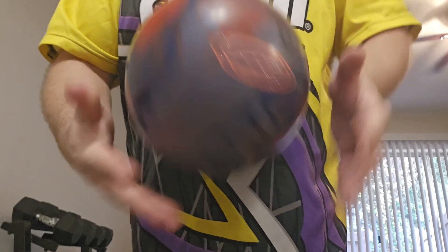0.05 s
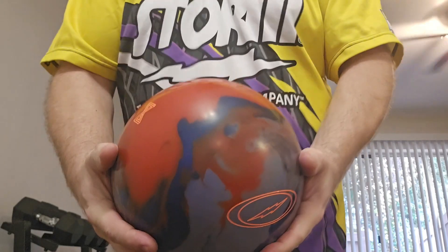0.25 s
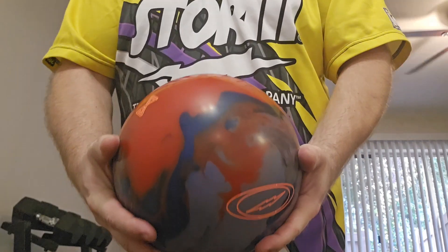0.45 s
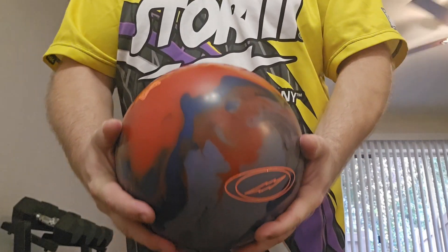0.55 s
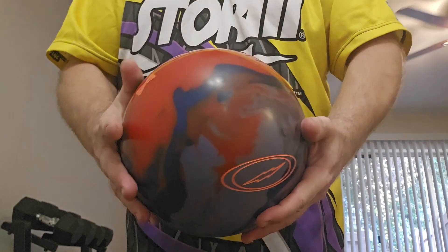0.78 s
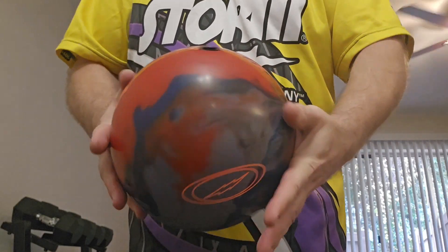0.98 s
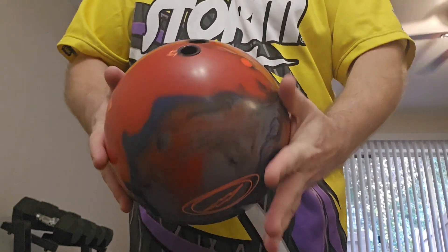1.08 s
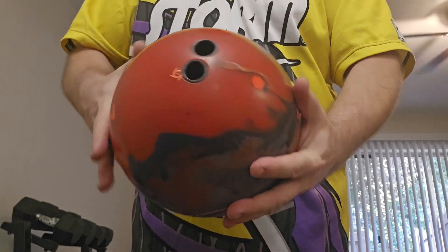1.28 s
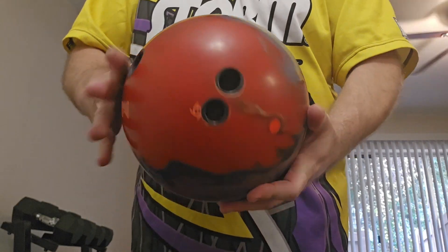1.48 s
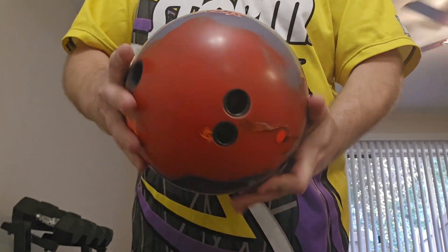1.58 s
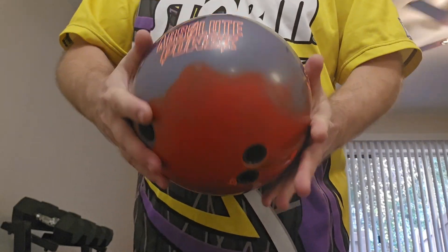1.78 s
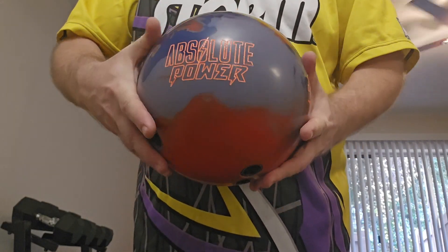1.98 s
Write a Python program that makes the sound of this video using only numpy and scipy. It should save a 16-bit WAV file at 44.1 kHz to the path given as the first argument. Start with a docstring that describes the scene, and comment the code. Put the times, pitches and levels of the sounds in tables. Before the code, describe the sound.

A bowling ball smacks into bare hands, then skin faintly slides and squeaks on it.

```python
"""A bowling ball drops into two bare hands, close up: one palm, then the other and the fingers smack on it.
Each patch of skin cracks and squeezes out a puff of air; the palms thud and the shell rings faintly.
The hands then turn the polished ball: skin slides in grainy swells, fingers pat, and twice the skin
sticks and slips into a squeak. A small room answers, over a low mains hum."""
import sys
import numpy as np
from scipy import signal
from scipy.fft import rfft, irfft, next_fast_len
from scipy.io import wavfile
from scipy.ndimage import map_coordinates

SR = 44100
rng = np.random.default_rng(int(sys.argv[2]) if len(sys.argv) > 2 else 0)


def materialize(psi):
    """Save the field psi as 16-bit PCM at rate SR to the path in sys.argv[1].

    A 1-D psi becomes a single channel; in a 2-D psi each row is a channel.
    """
    bounded = np.clip(np.atleast_2d(psi).T, -1, 1)
    quanta = np.round(bounded * 32767).astype(np.int16)
    wavfile.write(sys.argv[1], SR, quanta)


N = 90404

# tone colour of skin striking the ball: freq_hz, level_db
SKIN_COLOUR = [(100, 7.5), (300, -6), (500, 0.5), (720, -8), (1250, -2), (1700, -9), (2150, -2.5),
               (3000, -9), (4600, -4), (6800, -2.5), (9000, -2), (11700, -4.5), (13000, 0), (15500, -1.5)]
# stereo image of close-up noise: freq_hz, left_right_likeness
CLOSE_LIKENESS = [(200, 0.99), (1000, 0.83), (2200, 0.38), (5000, 0.17), (9000, 0.11), (13000, 0.3)]


def amp(db):
    """Decibels to gain."""
    return 10 ** (np.asarray(db) / 20)


def unit(x):
    """Scale to rms 1."""
    return x / np.sqrt(np.mean(x ** 2) + 1e-20)


def clock():
    """The time of each sample in seconds."""
    return np.arange(N) / SR


def along(points, hz):
    """Read a curve of (freq_hz, value) points on a log frequency axis."""
    freqs, values = np.transpose(points)
    return np.interp(np.log(hz + 1), np.log(freqs + 1), values)


def wobble(rate):
    """A smooth random curve, rate knots a second."""
    return map_coordinates(rng.standard_normal(N // 2), [clock() * rate], mode="wrap")


def filtered(x, response):
    """Filter x by a gain given as a function of Hz."""
    size = next_fast_len(N + SR // 4)
    return irfft(rfft(x, size) * response(np.fft.rfftfreq(size, 1 / SR)), size)[..., :N]


def noise(colour_db, likeness):
    """Stereo noise of rms 1 with a colour (function of Hz) and a left-right likeness curve."""
    def response(hz):
        width = np.arccos(np.clip(along(likeness, hz), -1, 1)) / 2
        return amp(colour_db(hz)) * [np.cos(width), np.sin(width)]
    mid, side = filtered(rng.standard_normal((2, N)), response)
    return unit(np.array([mid + side, mid - side]))


def close_noise(colour, tilt=0):
    """Close-up noise, brightened above 500 Hz by tilt dB per octave."""
    return noise(lambda hz: along(colour, hz) + tilt * np.log2(np.maximum(hz, 500)), CLOSE_LIKENESS)


def pan(db):
    """Channel gains that put the left db above the right."""
    return amp([[db / 2], [-db / 2]])


def burst(start, rise, t60):
    """A straight attack, then an exponential decay."""
    age = clock() - start
    return np.clip(age / rise, 0, 1) * amp(-60 * np.maximum(age - rise, 0) / t60)


def ring(start, modes, rise_s=0.00089):
    """Damped modes set off by a blow."""
    age = np.maximum(clock() - start, 0)
    return sum(burst(start, rise_s, t60) * amp(db) * np.sin(2 * np.pi * hz * age) for hz, db, t60 in modes)


def whistle(peak_s, hz, db, half_length_s, jitter, rate):
    """A short swell of an unsteady tone."""
    pitch = hz * (1 + jitter * wobble(rate))
    tone = np.sin(2 * np.pi * np.cumsum(pitch) / SR)
    return amp(db) * np.exp(-((clock() - peak_s) / half_length_s) ** 2) * unit(tone)


def room_tone(level_db=-62.5):
    """A bed of low rumble and faint hiss, wide in the treble."""
    colour = [(18, -49), (30, -1.5), (133, -3.5), (152, -11.5), (182, -15.5), (359, -16.5), (673, -22.5),
              (767, -25), (945, -25.5), (1680, -31.5), (2180, -31), (2910, -35.5), (4660, -34.5),
              (10200, -44.5), (15500, -40)]  # the still room: freq_hz, level_db
    likeness = [(60, 0.83), (250, 0.79), (600, 0.86), (1500, 0.033), (10000, 0.058)]  # its stereo image: freq_hz, left_right_likeness
    return amp(level_db) * noise(lambda hz: along(colour, hz), likeness)


def mains_hum(pitch_hz=120.3, waver_db=1.5):
    """A low mains hum, each harmonic wavering on its own."""
    harmonics = [-59.5, -76, -83.5, -85.5]  # from the fundamental up: level_db
    phase = 2 * np.pi * pitch_hz * clock() + 0.1 * wobble(6.9)
    return sum(amp(db + waver_db * wobble(4.3)) * np.sqrt(2) * np.sin(k * phase)
               for k, db in enumerate(harmonics, 1))


def room_reverb(x, tail_db=-15, early_db=-10, early_t60_s=0.2, predelay_s=0.005):
    """Quick reflections from body and walls and a tail shortest in the treble, coloured by the room."""
    decay = [(150, 0.6), (350, 1.0), (700, 0.5), (1400, 0.7), (4000, 0.74), (9000, 0.55), (15000, 0.36)]  # length of the tail: freq_hz, t60_s
    colour = [(80, -7), (180, 7), (360, 6), (550, 4), (1200, 3), (2500, 4), (5000, 0), (8500, -4.5),
              (10200, -4), (15000, -1.5)]  # EQ on the whole reverb: freq_hz, gain_db
    hz, t, spectra = signal.stft(rng.standard_normal((2, SR)), SR, nperseg=256)
    fade = amp(-60 * t / along(decay, hz)[:, None])
    tail = signal.istft(spectra * fade, SR, nperseg=256)[1][:, :SR]
    early = rng.standard_normal((2, SR)) * amp(-60 * clock()[:SR] / early_t60_s)
    impulse = amp(tail_db) * tail / np.linalg.norm(tail[0])
    impulse += amp(early_db) * early / np.linalg.norm(early[0])
    impulse = np.pad(impulse, ((0, 0), (int(predelay_s * SR), 0)))
    wet = signal.fftconvolve(x, impulse, axes=1)[:, :N]
    return filtered(wet, lambda f: amp(along(colour, f)))


def skin_slides(graze_s=0.205, graze_db=-54.5, graze_rise_s=0.0024, grain_db=2.0, grain_rate=600):
    """Skin slides over the polished shell: a fine sizzle, one graze and short swells, all grainy."""
    turning = [(0.66, -99), (0.72, -71), (0.93, -79), (1.08, -72), (1.17, -68.5), (1.25, -72), (1.45, -73),
               (1.54, -84), (1.8, -78), (2.04, -80)]  # the sizzle as the ball is turned: time_s, level_db
    sizzle_colour = [(1000, -18), (4000, -9.5), (7500, -9), (10300, -17.5), (12000, -5), (13500, -6),
                     (15000, -1)]  # freq_hz, level_db
    strokes = [(0.015, -60.5, 0.01, 0.032, 1.5), (0.042, -61, 0.008, 0.012, 0.5),
               (0.694, -65.5, 0.018, 0.05, 0), (0.726, -57.5, 0.018, 0.028, -0.5),
               (0.813, -54.5, 0.01, 0.016, 7), (0.89, -68.5, 0.03, 0.022, -2),
               (0.991, -60.5, 0.016, 0.027, -1), (1.125, -63, 0.027, 0.043, 4),
               (1.31, -68.5, 0.025, 0.035, -1), (1.427, -70.5, 0.029, 0.06, 0),
               (1.579, -74.5, 0.016, 0.02, -2), (1.63, -62.5, 0.016, 0.0174, 2),
               (1.76, -77, 0.088, 0.14, -0.5), (1.892, -61, 0.016, 0.036, 0),
               (1.96, -71, 0.045, 0.0794, -5.5)]  # single slides: peak_s, level_db, rise_s, release_s, tilt_db_per_octave
    stroke_colour = [(300, -19.5), (1200, -16.5), (2200, -9.5), (4500, -2), (7500, -3), (10300, -10),
                     (12000, -0.5), (15500, -8.5)]  # freq_hz, level_db
    t = clock()
    friction = amp(np.interp(t, *np.transpose(turning), left=-120)) * close_noise(sizzle_colour)
    # the falling ball grazes the fingers just before it lands
    graze = np.exp(-np.abs((t - graze_s) / graze_rise_s))
    friction += amp(graze_db) * graze * close_noise(SKIN_COLOUR)
    for peak, db, rise, release, tilt in strokes:
        swell = np.exp(-np.where(t < peak, ((peak - t) / rise) ** 2, (t - peak) / release))
        friction += amp(db) * swell * close_noise(stroke_colour, tilt)
    return friction * unit(amp(grain_db * wobble(grain_rate)))


def singing_slides():
    """Some slides sing faintly, just short of a squeak."""
    tones = [(0.034, 3245, -66.5, 0.013), (0.721, 3160, -71.5, 0.024), (0.99, 4500, -69.5, 0.011),
             (1.053, 4400, -73, 0.0086), (1.909, 5330, -69.5, 0.023), (1.957, 4410, -74, 0.04)]  # peak_s, pitch_hz, level_db, half_length_s
    return sum(whistle(*tone, jitter=0.065, rate=1100) for tone in tones)


def finger_pats(rise_s=0.00056):
    """Fingers land softly as the grip changes, each a tick of noise and a hollow knock."""
    pats = [(0.0346, -51.5, 0.01, -4, -1), (0.7735, -65, 0.015, 0.5, 3), (0.8065, -46.5, 0.035, 2, -2.5),
            (1.888, -59, 0.03, -2, 0.5), (1.947, -61, 0.034, -3.5, -3.5)]  # start_s, level_db, t60_s, knock_db, tilt_db_per_octave
    tick_colour = [(100, -2), (250, -19.5), (600, 6.5), (1150, -11), (2000, -7.5), (2800, -4.5),
                   (5000, -1.5), (10000, -7), (15000, -11.5)]  # freq_hz, level_db
    knock_modes = [(112, -1.5, 0.04), (470, -0.5, 0.025), (770, -4, 0.021), (1620, -5.5, 0.025),
                   (1994, -7.5, 0.036), (2330, -4, 0.019)]  # pitch_hz, level_db, t60_s
    out = np.zeros((2, N))
    for start, db, t60, knock_db, tilt in pats:
        tick = burst(start, rise_s, t60) * close_noise(tick_colour, tilt)
        out += amp(db) * (tick + amp(knock_db) * ring(start, knock_modes))
    return out


def stick_slip(glide, partials, jitter, flutter_db, pan_db, lag_ms):
    """Skin sticks and slips at an unsteady rate; the right channel hears it lag_ms later."""
    times, hz, db = np.transpose(glide)
    t = clock()
    pitch = np.interp(t, times, hz) * (1 + jitter * wobble(900))
    lag_s = np.array([[0], [lag_ms / 1000]])
    phase = 2 * np.pi * (np.cumsum(pitch) / SR - pitch * lag_s)
    level = amp(np.interp(t, times, db, left=-140, right=-140) + flutter_db * wobble(400))
    tone = sum(amp(partial_db) * np.sin(ratio * phase) for ratio, partial_db in partials)
    return pan(pan_db) * level * unit(tone)


def skin_squeaks():
    """Skin catches twice on the polish: a thin falling chirp, then a lower, richer squeak."""
    chirp_glide = [(0.7245, 9410, -75), (0.7266, 8900, -29.5), (0.7279, 8440, -73), (0.7290, 8150, -35),
                   (0.7325, 7960, -62), (0.737, 7880, -56)]  # played 1% flat: time_s, pitch_hz, level_db
    squeak_glide = [(1.115, 2900, -76), (1.120, 2814, -48.5), (1.131, 2920, -46), (1.140, 2963, -48),
                    (1.150, 2860, -56.5), (1.168, 2870, -74)]  # time_s, pitch_hz, level_db
    harmonics = [-5, -2, -4.5, -4.5, -4]  # of the squeak, from the fundamental up: level_db
    undertone = (1 / 3, -21.5)  # every third slip is stronger: pitch_ratio, level_db
    partials = [undertone, *enumerate(harmonics, 1)]
    chirp = stick_slip(chirp_glide, [(0.99, 0)], jitter=0.017, flutter_db=0, pan_db=3.5, lag_ms=0.014)
    squeak = stick_slip(squeak_glide, partials, jitter=0.03, flutter_db=2, pan_db=5.5, lag_ms=0.14)
    return chirp + squeak


def ball_catch(puff_width_hz=900):
    """Each patch of skin cracks and squeezes out a puff of air; the palms thud, the ball rings faintly."""
    # skin meeting the ball: start_s, level_db, rise_s, t60_s, puff_hz, puff_db, pan_db
    slaps = [(0.2098, -27.5, 0.0024, 0.016, 13500, -3, 1), (0.213, -29, 0.00019, 0.04, 5800, -16.5, -4.5),
             (0.2217, -28, 0.0012, 0.02, 5600, 0.5, 3.5), (0.2291, -27, 0.0018, 0.05, 10300, -2.5, 3),
             (0.2363, -35.5, 0.00088, 0.036, 7200, 2, -1.5)]
    # whistles as the skin seals against the shell: peak_s, pitch_hz, level_db, half_length_s, pan_db
    seals = [(0.2247, 10700, -20.5, 0.0009, -5), (0.2287, 15000, -25, 0.0004, 11)]
    thuds = [(0.2134, -47), (0.2276, -39.5)]  # the weight sinking into each palm: start_s, level_db
    palm_modes = [(41.5, -9, 0.2), (139.4, 0, 0.039), (370, -6.5, 0.038), (499, -3.5, 0.038)]  # pitch_hz, level_db, t60_s
    shell_modes = [(1280, -11.5, 0.07), (1980, -18, 0.054), (2560, -19, 0.09), (3470, -8.5, 0.2),
                   (4710, -20, 0.11)]  # pitch_hz, level_db, t60_s
    smacks = np.zeros((2, N))
    for start, db, rise, t60, puff_hz, puff_db, pan_db in slaps:
        puff = noise(lambda f: -20 * np.log10(1 + ((f - puff_hz) / puff_width_hz) ** 2), CLOSE_LIKENESS)
        crack = close_noise(SKIN_COLOUR)
        smacks += amp(db) * pan(pan_db) * burst(start, rise, t60) * (crack + amp(puff_db) * puff)
    for peak, hz, db, half_length, pan_db in seals:
        smacks += pan(pan_db) * whistle(peak, hz, db, half_length, jitter=0.097, rate=3000)
    weight = sum(amp(db) * (ring(start, palm_modes) + ring(start, shell_modes)) for start, db in thuds)
    return smacks + weight


def scene(squeak_send_db=-1):
    """Hands and ball up front, the room behind; the squeaks reach the reverb a little less."""
    squeaks = skin_squeaks()
    hands = ball_catch() + finger_pats() + skin_slides() + singing_slides()
    reverb = room_reverb(hands + amp(squeak_send_db) * squeaks)
    return hands + squeaks + reverb + mains_hum() + room_tone()


def record(dry, low_cut_hz=15, top_hz=15900):
    """A gentle low cut on the deepest rumble and a brick wall on the top end."""
    return filtered(dry, lambda hz: (hz < top_hz) * (1j * hz / (low_cut_hz + 1j * hz)) ** 2)


dry = scene()
out = record(dry)
materialize(out)
```